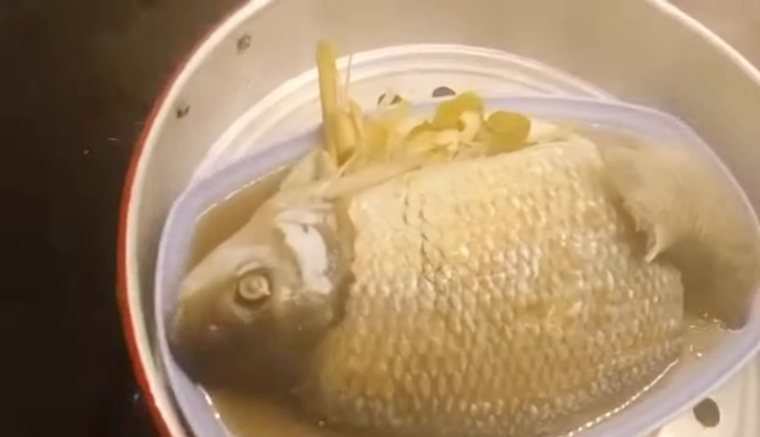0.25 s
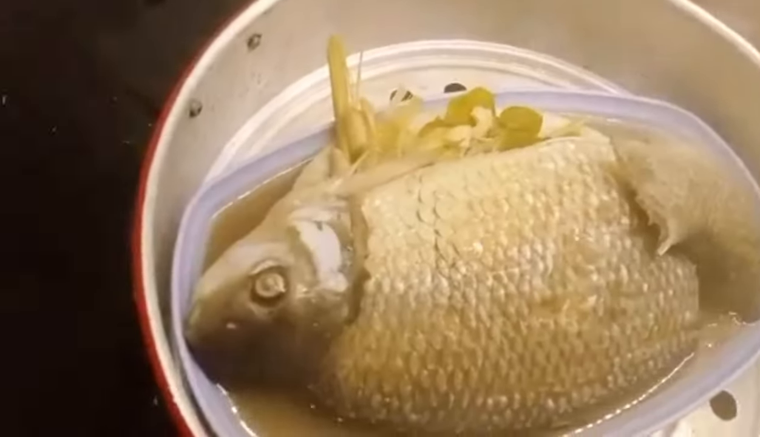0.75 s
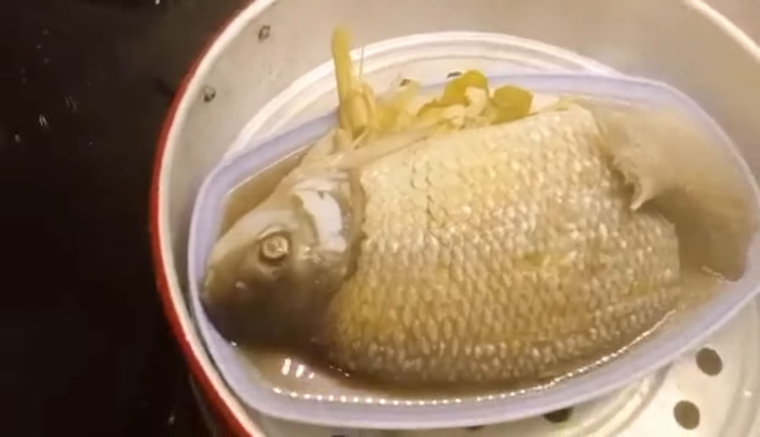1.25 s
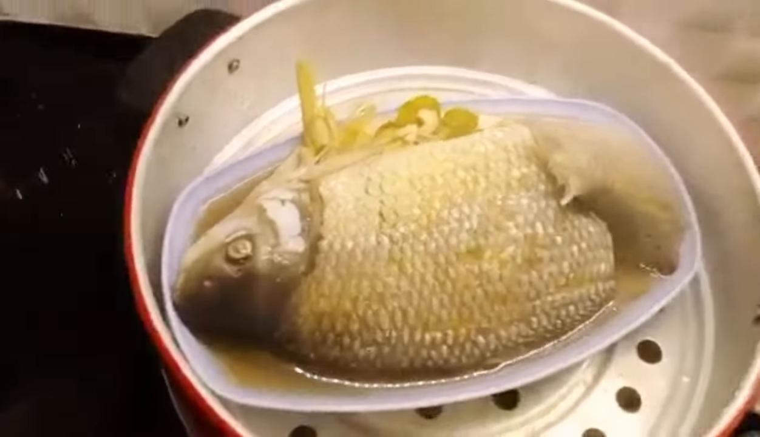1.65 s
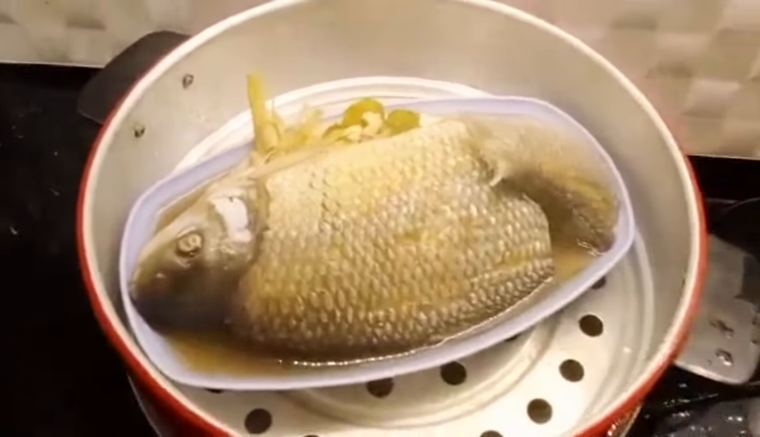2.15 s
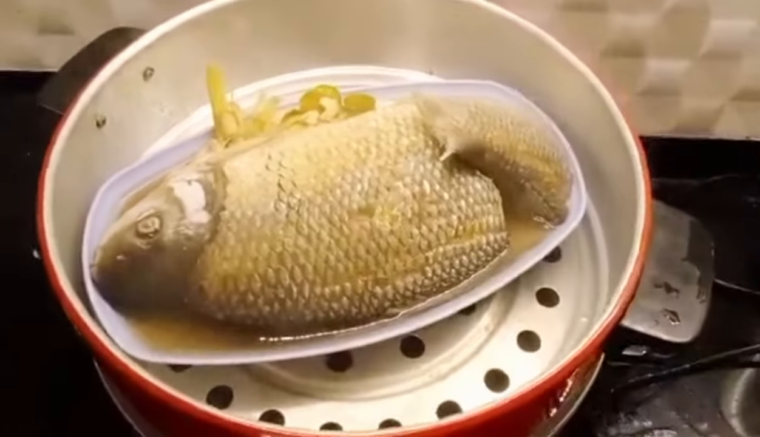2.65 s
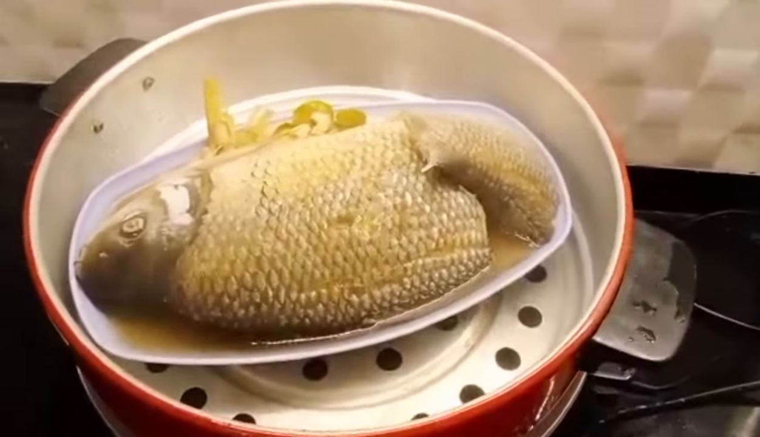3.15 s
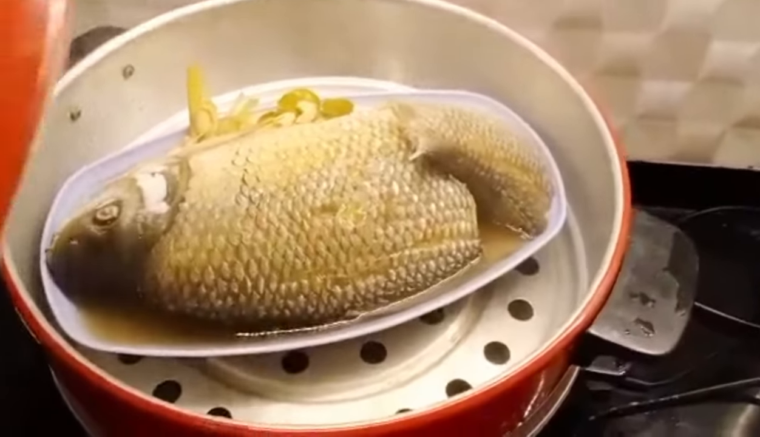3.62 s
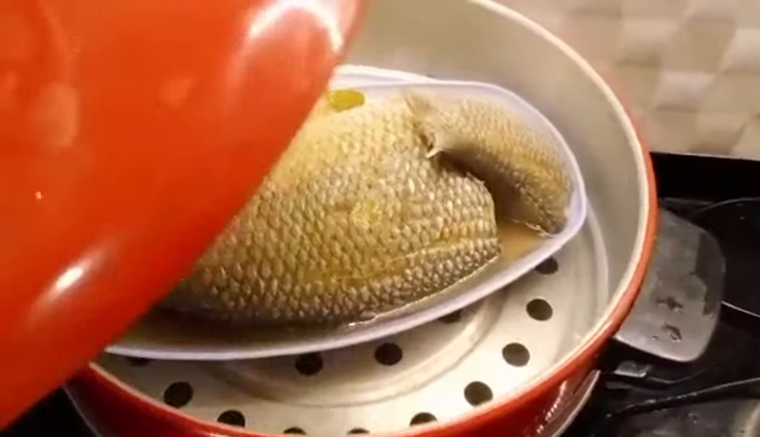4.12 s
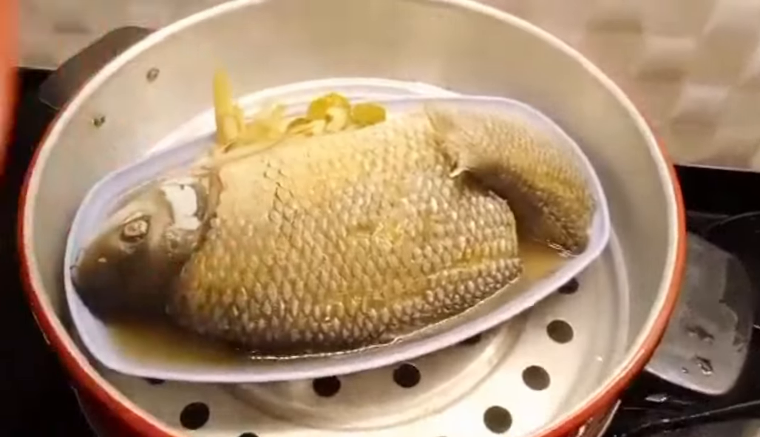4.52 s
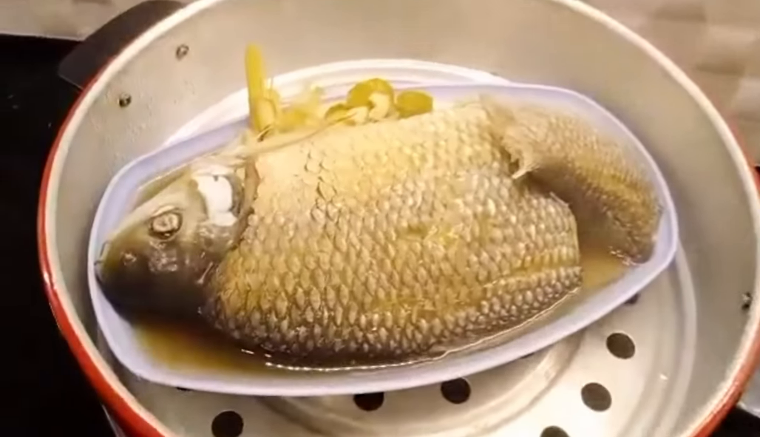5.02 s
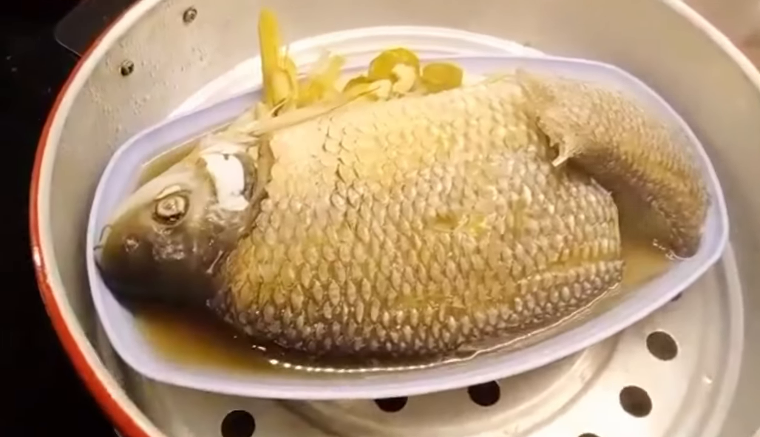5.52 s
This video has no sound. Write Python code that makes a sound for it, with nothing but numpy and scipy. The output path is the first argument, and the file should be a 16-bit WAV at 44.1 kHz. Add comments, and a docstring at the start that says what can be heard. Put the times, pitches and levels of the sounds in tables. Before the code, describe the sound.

A continuous, forceful rush of steam from a boiling pot fills the foreground, surging a little, with sizzling spray on top and weak rumble below. Two knocks ring the pot briefly, the second brighter. Shortly after, the passing lid reflects the boil as a brief hollow swell. Handheld microphone close by in a kitchen, with processed, patchy, warbling noise and a dull cutoff at the very top.

```python
"""Steam rushes hard from an open, boiling steamer pot on a kitchen stove, heard from close above.
Jet, throat, hiss and spray are bands of flickering noise; the treble is wide, its side gated in patches.
Noise suppression opens and closes the low edge of the noise and leaves narrow noise blobs;
below lie faint noise bands, a low hum and rumble. Two knocks ring the pot, a lid throws the boil back."""
import sys
import numpy as np
from scipy import signal
from scipy.fft import rfft, irfft, next_fast_len
from scipy.io import wavfile

SR = 44100
rng = np.random.default_rng(int(sys.argv[2]) if len(sys.argv) > 2 else 0)


def amplitude_ratio(level_db):
    """Convert a level in decibels to the matching linear amplitude (field) ratio."""
    exponent = np.asarray(level_db, float) / 20
    return 10 ** exponent


def waveform_to_disk(signal):
    """Save audio, clipped to [-1, 1], as 16-bit WAV at the path in sys.argv[1]."""
    frames = np.transpose(np.atleast_2d(signal))
    scaled = np.clip(frames, -1, 1) * 32767
    samples = np.round(scaled).astype(np.int16)
    wavfile.write(sys.argv[1], SR, samples)


N = 254872

# The steam. Each row: time in seconds, flow in dB (only its swing counts),
# extra level of the throat of the rack holes in dB, extra level of the treble in dB.
STEAM_FLOW = [(0, -14.5, -2, -1), (.18, -14, 0.5, 2.5), (.4, -14.5, 0.5, -0.5), (.75, -16.5, 0, .5),
              (1.06, -19, -8, 1.5), (1.2, -17.5, -2, 1.5), (1.35, -14.5, 1, -0.5), (1.6, -17, 2.5, 4.5),
              (1.85, -14.5, -1.5, -1), (2.08, -17, -1, 2), (2.27, -11.5, 2, -5), (2.42, -12, -3, -4.5),
              (2.64, -18, 0.5, 1.5), (3.0, -18.5, -1, 0.5), (3.15, -16.5, -3.5, -1.5), (3.48, -15.5, 3, 0),
              (3.68, -15, -1.5, -0.5), (3.87, -15.5, 3, 1), (4.1, -16.5, 3.5, -1), (4.5, -17.5, 0, 0),
              (4.65, -15.5, -1.5, -3), (4.8, -19, 2, 1), (5.15, -18, -2, 0.5), (5.5, -18, 1, 0),
              (5.75, -14.5, 2, 0.5)]
# The noise's low edge, moved by noise suppression. Each row: time in seconds,
# level of its upper part in dB, level of its lower part in dB.
LOW_EDGE_LEVELS = [(0, -27, -24.5), (.2, -27.5, -26.5), (.7, -25, -31), (.9, -30, -28.5),
                   (1.25, -29.5, -28.5), (1.5, -26, -28), (1.72, -29, -28.5), (1.9, -25.5, -31.5),
                   (2.3, -22, -27.5), (2.55, -26, -28), (2.68, -25.5, -38.5), (3.0, -26, -38.5),
                   (3.15, -26, -24), (3.4, -26, -50), (3.53, -24.5, -26.5), (3.65, -28.5, -36.5),
                   (3.82, -26, -23.5), (4.1, -29.5, -36), (4.45, -33.5, -40), (4.8, -32.5, -39),
                   (5.1, -31.5, -42), (5.3, -29.5, -43), (5.45, -26.5, -47), (5.63, -29, -40),
                   (5.76, -33.5, -32)]
# Noise colours, of which only the shape counts. Each row: frequency in Hz, density in dB per Hz.
JET_SPECTRUM = [(1090, -23), (1850, -11.5), (1990, -2), (2480, 2), (3500, 1.5), (4550, -10.5), (7700, -120)]
THROAT_SPECTRUM = [(2000, -11.5), (3400, -4), (4000, 1.5), (4600, -7.5), (5980, -43), (10100, -120)]
HISS_SPECTRUM = [(2650, -22), (4500, -3), (6690, -3), (7800, -10.5), (10100, -50), (17200, -120)]
SPRAY_SPECTRUM = [(4290, -55), (7300, -6), (9380, -14), (11300, -9), (12500, 2), (13000, 6)]
UPPER_EDGE_SPECTRUM = [(780, -29), (1330, 1), (1510, 3), (1830, 0), (1950, 1.5), (2540, -17.5),
                       (4290, -120)]
LOWER_EDGE_SPECTRUM = [(490, -42), (830, -11), (880, -3), (983, -2.5), (1100, 10), (1350, 6.5), (1760, -43),
                       (2970, -120)]
LID_HOLLOW_SPECTRUM = [(220, -56), (380, -13), (437, -3.5), (486, -1), (569, -5.5), (628, 0), (689, -2),
                       (750, -10), (786, -10), (875, 1), (1050, 0), (1360, -40), (2310, -120)]
RUMBLE_SPECTRUM = [(15, -43), (25, -16.5), (101, 1), (163, -3.5), (214, -10), (327, 1.5), (387, -3.5),
                   (451, 1), (549, -6.5), (640, 1), (756, -7), (841, 1), (950, -5), (1240, -27),
                   (2090, -120)]
# Stereo width ahead of the side gate. Each row: frequency in Hz, side against middle in dB.
STEREO_WIDTH = [(3950, -72), (4150, -8), (5500, -2), (7500, -4), (9500, -2.5), (12000, -3), (12700, -4.5),
                (12900, -60)]
# How readily the side gate opens. Each row: frequency in Hz, margin in spreads of chance.
SIDE_GATE_MARGIN = [(3000, -0.24), (4300, -0.36), (4900, 0.3), (5600, 0.64), (7000, 2.1), (9000, 0.95),
                    (11000, 1.24), (13500, -0.3)]
# Faint noise bands and a low hum. Each row: frequency in Hz, width in Hz, level at mean flow in dB,
# waver in dB.
FLOW_BANDS = [(160, 4.9, -60, 1.5), (1500, 115, -39, 0.5), (4090, 910, -44, 6.5)]
# Random short noise blobs. Each row: rate per second, frequency in Hz, width in Hz, length in seconds,
# level in dB against the lower edge noise.
NARROW_BLOBS = [(3.2, 1090, 42, .07, -4.5), (4.0, 1210, 36, 0.09, -3.5), (4.0, 1490, 53, .07, -5),
                (3.4, 1650, 53, 0.085, -2.5)]
# Level of the rumble away from the lid. Each row: time in seconds, level in dB.
RUMBLE_CURVE = [(0, -44.5), (.55, -45), (.95, -47), (1.4, -47), (2.2, -45.5), (3.0, -47.5), (3.5, -43),
                (4.3, -46.5), (5.25, -46), (5.78, -40)]
# Narrow noise blobs, as noise suppression leaves. Each row: centre in seconds, length in seconds,
# frequency in Hz, level in dB.
SUPPRESSOR_BLOBS = [(0.052, 0.23, 283, -47), (0.446, 0.084, 423, -41.5), (0.464, .14, 90, -44),
                    (0.668, 0.031, 106, -39), (1.375, 0.086, 90, -43.5), (1.7, 0.056, 870, -34),
                    (1.925, 0.14, 88.5, -46.5), (2.08, .075, 858, -41), (2.2, 0.106, 310, -48),
                    (2.591, 0.068, 110, -43), (3.15, 0.11, 160, -39), (3.164, .12, 89.5, -44),
                    (3.19, 0.12, 486, -38), (3.312, 0.026, 1076, -27.5), (3.619, 0.12, 878, -37),
                    (3.69, 0.078, 151, -43), (3.702, 0.13, 620, -38), (3.79, .1, 653, -32),
                    (3.82, 0.074, 90, -44), (3.85, 0.041, 476, -29), (3.91, 0.039, 860, -25),
                    (4.012, 0.18, 615, -37), (4.113, 0.13, 890, -36), (4.504, 0.3, 1056, -34.5),
                    (4.692, 0.14, 1064, -35), (4.585, .08, 99, -44), (4.733, 0.088, 327, -40),
                    (4.86, 0.35, 1463, -33), (5.131, 0.055, 1056, -33), (5.52, 0.1, 160, -44),
                    (5.667, 0.11, 91, -47), (5.68, 0.086, 856, -41.5), (5.72, 0.051, 1216, -32)]
# Knocks. Each row: start in seconds, drive of the contact in dB ahead of its band filter, lowest and
# highest frequency of the contact in Hz, rattle against click in dB, rattle t60 in seconds.
KNOCK_HITS = [(.846, -26.5, 70, 900, -25, 0.13), (3.139, -16.5, 550, 1600, -23.5, 0.22)]
# Modes of the knocked pot. Each row: frequency in Hz, level in dB, t60 in seconds.
POT_MODES = [(95, -8, 0.11), (190, -6, 0.032), (223, -12, 0.05), (273, -10, .08), (448, -7, 0.13),
             (592, -10.5, 0.09), (679, -1.5, 0.052), (1160, 2, 0.061)]

LID_ARRIVES_S, LID_HOLD_S, LID_DB = 3.825, 0.054, -25
LID_RISE_DB_PER_S, LID_FALL_DB_PER_S = 57, 101
RUMBLE_UNDER_LID_DB = 6
SPRAY_SHARE_OF_TREBLE = 0.6


def rms_one(x):
    """Scale to unit rms."""
    return x / np.sqrt(np.mean(x ** 2) + 1e-20)


def in_time(rows):
    """Columns of a curve table, one value a sample."""
    s, *columns = np.transpose(rows)
    return [np.interp(np.arange(N) / SR, s, column) for column in columns]


def at_hz(points, hz):
    """Read a spectrum on a log-frequency axis; silent beyond its ends."""
    f, db = np.transpose(points)
    return np.interp(np.log(hz + 1e-9), np.log(f), db, left=-150, right=-150)


def drift(rate):
    """Slow chance of spread 1, wandering about `rate` times a second."""
    r = np.exp(-64 * np.pi * rate / SR)  # drawn once every 32 samples
    chance = rng.standard_normal(N // 32 + 2002)
    slow = rms_one(signal.lfilter([1], [1, -2 * r, r * r], chance)[2000:])
    return np.interp(np.arange(N) / 32, np.arange(len(slow)), slow)


def ring(x, hz, t60):
    """A unit click sets a sine of height 1 ringing."""
    r, w = amplitude_ratio(-60 / (t60 * SR)), 2 * np.pi * hz / SR
    return signal.lfilter([0, np.sin(w)], [1, -2 * r * np.cos(w), r * r], x + 1e-18)


def narrow_noise(hz, width_hz, count):
    """Noise twice through a narrow resonance; rms 1."""
    t60 = np.log(1000) / (np.pi * width_hz)
    once = ring(rng.standard_normal(count + 4000), hz, t60)
    return rms_one(ring(once, hz, t60)[4000:])


def random_blobs(per_s, hz, width_hz, length, level_db):
    """Random soft blobs of narrow noise, each with a bell-shaped swell."""
    marks = (rng.random(N) < per_s / SR) * amplitude_ratio(2.17 * rng.standard_normal(N))
    bell = np.exp(-(2 * np.arange(-SR // 4, SR // 4) / SR / length) ** 2)
    envelope = signal.fftconvolve(marks, bell, "same")
    return amplitude_ratio(level_db) * envelope * narrow_noise(hz, width_hz, count=N)


def rush(spectrum, count, gust, patchy_db, patch_rate, grain_db=0., side_gate=None):
    """Noise in overlapping bands; each band flickers partly with the gust, partly alone."""
    size = next_fast_len(N)
    hz = np.arange(size // 2 + 1) * SR / size
    sparks = amplitude_ratio(grain_db * np.minimum(rng.exponential(1, (2, size)), 5))  # uneven grains
    mid, side = rfft(rng.standard_normal((2, size)) * sparks) * amplitude_ratio(at_hz(spectrum, hz))
    side = side * amplitude_ratio(at_hz(STEREO_WIDTH, hz))
    low_hz, high_hz = spectrum[1][0], spectrum[-2][0]
    place = np.log((hz + 1e-9) / low_hz) / np.log(high_hz / low_hz) * (count - 1)
    place = np.clip(place, 0, count - 1)
    centres_hz = np.geomspace(low_hz, high_hz, count)
    out = np.zeros((2, N))
    for k in range(count):
        window = np.cos(np.pi / 2 * np.clip(place - k, -1, 1)) ** 2
        flicker = amplitude_ratio(gust + patchy_db * drift(patch_rate))
        out += flicker * irfft(mid * window, size)[:N]
        if side_gate:  # the side signal switches in and out in patches
            together, stripes = side_gate
            margin = at_hz(SIDE_GATE_MARGIN, centres_hz[k]) + 0.66 * together + 0.81 * drift(7.1)
            gate = np.clip(6.7 * margin, 0, 1) * stripes
            out += flicker * gate * irfft(side * window, size)[:N] * [[1], [-1]]
    return out / np.sqrt(np.mean(out.mean(axis=0) ** 2))


def follow(control_db, mean_db, share, wander_db):
    """A level that shares the swing of a control and wanders a little by itself."""
    return mean_db + share * (control_db - control_db.mean()) + wander_db * drift(2.5)


def jet(level_db, gust):
    """The steam jet: turbulent noise that flickers partly with the gust, partly band by band."""
    return amplitude_ratio(level_db) * rush(JET_SPECTRUM, count=14, gust=0.93 * gust, patchy_db=0.74,
                                patch_rate=14.0, grain_db=1.0)


def throat(level_db, gust, side_gate):
    """Steam squeezed through the rack holes: a band of turbulent noise above the jet."""
    return amplitude_ratio(level_db) * rush(THROAT_SPECTRUM, count=7, gust=0.73 * gust, patchy_db=1.0,
                                patch_rate=10.5, grain_db=0.7, side_gate=side_gate)


def hiss(level_db, gust, side_gate):
    """Bright turbulence of the steam, whose bands flicker mostly each alone."""
    return amplitude_ratio(level_db) * rush(HISS_SPECTRUM, count=14, gust=0.26 * gust, patchy_db=3.0,
                                patch_rate=28.5, grain_db=-3.7, side_gate=side_gate)


def spray(level_db, gust, side_gate):
    """Fine spray sizzles as grainy noise at the very top."""
    return amplitude_ratio(level_db) * rush(SPRAY_SPECTRUM, count=9, gust=0.55 * gust, patchy_db=2.0,
                                patch_rate=19.0, grain_db=0.8, side_gate=side_gate)


def flow_bands(flow_db):
    """Faint noise bands and a low hum that follow the flow through the throat."""
    swing_db = flow_db - flow_db.mean()
    return sum(narrow_noise(hz, width_hz, count=N) * amplitude_ratio(level_db + swing_db + waver_db * drift(1.3))
               for hz, width_hz, level_db, waver_db in FLOW_BANDS)


def upper_edge(level_db):
    """Upper part of the noise's low edge, opened and closed by noise suppression."""
    return amplitude_ratio(level_db) * rush(UPPER_EDGE_SPECTRUM, count=8, gust=0, patchy_db=2.5, patch_rate=1.7)


def lower_edge(level_db):
    """Lower part of the noise's low edge, with random short narrow-band blobs of 1.1 to 1.65 kHz."""
    noise = rush(LOWER_EDGE_SPECTRUM, count=9, gust=0, patchy_db=3.5, patch_rate=9.3)
    return amplitude_ratio(level_db) * (noise + sum(random_blobs(*row) for row in NARROW_BLOBS))


def rumble():
    """Low noise of the boil, louder while the lid is over the pot."""
    level_db = in_time(RUMBLE_CURVE)[0] + RUMBLE_UNDER_LID_DB * amplitude_ratio(lid_pass())
    return amplitude_ratio(level_db) * rush(RUMBLE_SPECTRUM, count=16, gust=drift(2.6), patchy_db=3.0, patch_rate=17.0)


def low_blobs():
    """Random low blobs of narrow noise near 97 Hz, as noise suppression leaves."""
    return random_blobs(per_s=4.5, hz=97, width_hz=45, length=0.084, level_db=-52.5)


def suppressor_blobs(width_hz=22, widen=0.01, steady=1.0):
    """Leaking bands: narrow noise, wider the higher and fairly even, under a bell-shaped swell."""
    out, span = np.zeros(N + 2 * SR), SR // 2
    for s, length, hz, level_db in SUPPRESSOR_BLOBS:
        blob = narrow_noise(hz, width_hz + widen * hz, count=span)
        blob = rms_one(blob / (steady + np.abs(signal.hilbert(blob))))  # evens the strength
        bell = np.exp(-(2 * (np.arange(span) - span / 2) / SR / length) ** 2)
        start = SR + round(s * SR) - span // 2
        out[start:start + span] += amplitude_ratio(level_db) * bell * blob
    return out[SR:SR + N]


def knocks():
    """A soft contact is a band-limited click with a dying rattle; it sets the modes of the pot ringing."""
    push, after = np.zeros(N), np.arange(SR // 2) / SR
    for s, drive_db, low_hz, high_hz, rattle_db, t60 in KNOCK_HITS:
        touch = amplitude_ratio(rattle_db - 60 * after / t60) * rng.standard_normal(len(after))
        touch[0] = 1
        band = signal.butter(2, [low_hz, high_hz], "band", fs=SR, output="sos")
        push[round(s * SR):][:len(after)] += amplitude_ratio(drive_db) * signal.sosfilt(band, touch)
    contact = amplitude_ratio(23.0) * push
    return contact + sum(amplitude_ratio(level_db) * ring(push, hz, t60) for hz, level_db, t60 in POT_MODES)


def lid_pass():
    """Level of the lid's pass against its top: a rise, a hold and a fall, in dB."""
    s = np.arange(N) / SR - LID_ARRIVES_S
    rise_db = np.minimum(LID_RISE_DB_PER_S * s, 0)
    return rise_db - LID_FALL_DB_PER_S * np.maximum(s - LID_HOLD_S, 0)


def lid():
    """The boil resounds in the hollow of the passing lid."""
    hollow = rush(LID_HOLLOW_SPECTRUM, count=10, gust=0, patchy_db=4.0, patch_rate=6.2)
    return amplitude_ratio(LID_DB + lid_pass()) * hollow


def scene():
    """Jet, throat, hiss and spray share one fast gust; the low layers, knocks and lid are added."""
    flow_db, more_throat_db, more_treble_db = in_time(STEAM_FLOW)
    upper_db, lower_db = in_time(LOW_EDGE_LEVELS)
    jet_db = follow(flow_db, mean_db=-21, share=0.62, wander_db=0.56)
    throat_db = follow(flow_db, mean_db=-22.5, share=0.99, wander_db=1) + more_throat_db
    hiss_db = follow(flow_db, mean_db=-20, share=1.33, wander_db=0.54) + more_treble_db
    spray_db = follow(flow_db, mean_db=-24.5, share=1, wander_db=0.51)
    spray_db = spray_db + SPRAY_SHARE_OF_TREBLE * more_treble_db
    gust = drift(32.0)
    # slow drop-outs and fast dips of the side signal
    side_gate = drift(6.0), amplitude_ratio(4.0 * np.minimum(drift(35.0), 0.8))
    steam = jet(jet_db, gust) + throat(throat_db, gust, side_gate)
    steam = steam + hiss(hiss_db, gust, side_gate) + spray(spray_db, gust, side_gate)
    low_edge = upper_edge(upper_db) + lower_edge(lower_db)
    faint = flow_bands(throat_db) + rumble() + low_blobs() + suppressor_blobs()
    return steam + low_edge + faint + knocks() + lid()


def band_limit(x):
    """A steep low-pass at the top of the band."""
    return signal.sosfilt(signal.butter(12, 14430, fs=SR, output="sos"), x)


def record(dry):
    """The microphone loses the deep bass; peaks are rounded under full scale; the top is cut off sharply."""
    bass_cut = signal.butter(2, 40.0, "high", fs=SR, output="sos")
    top_cut = signal.ellip(12, 0.5, 90, 13070, fs=SR, output="sos")
    heard = signal.sosfilt(bass_cut, dry)
    knee = 6  # higher keeps more of the range below full scale straight
    rounded = heard / (1 + heard ** knee) ** (1 / knee)
    return band_limit(signal.sosfilt(top_cut, rounded))


dry = scene()
out = record(dry)
waveform_to_disk(out)
```